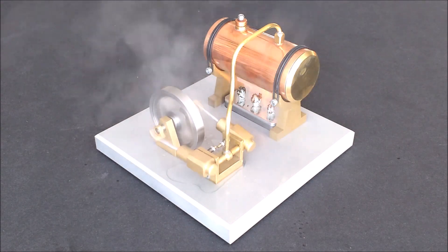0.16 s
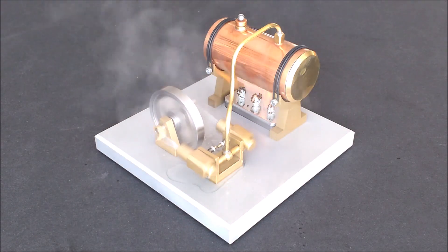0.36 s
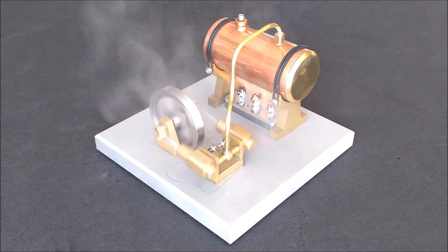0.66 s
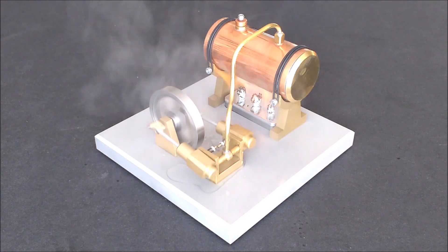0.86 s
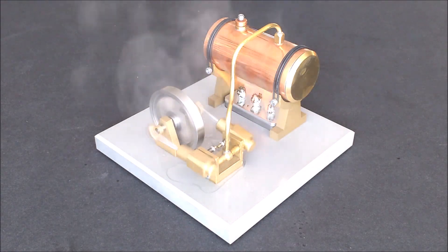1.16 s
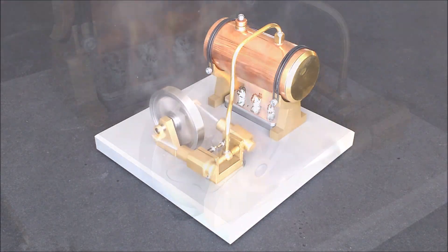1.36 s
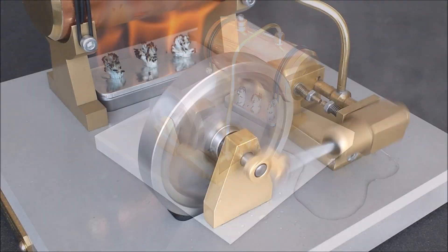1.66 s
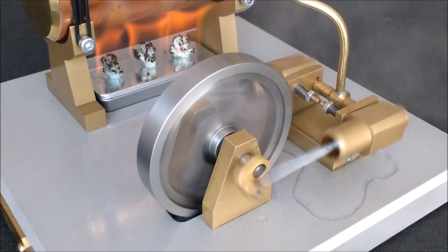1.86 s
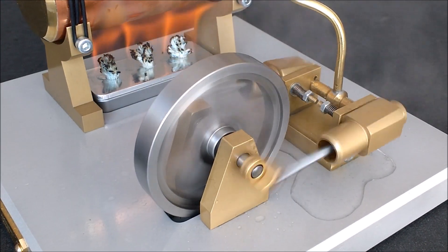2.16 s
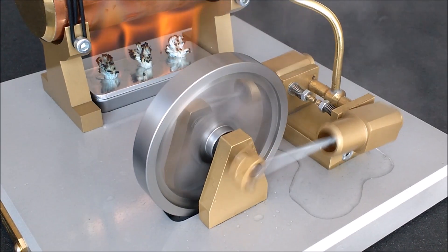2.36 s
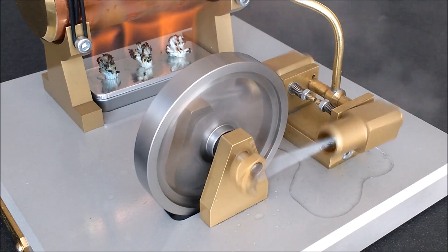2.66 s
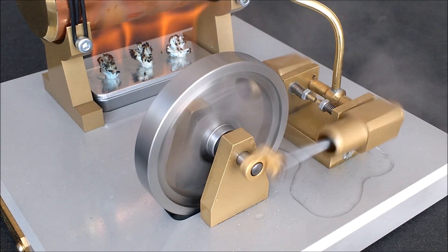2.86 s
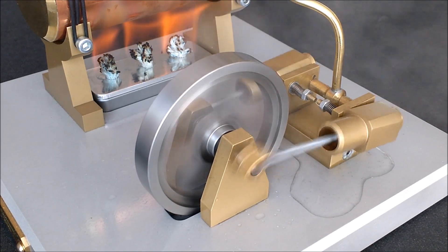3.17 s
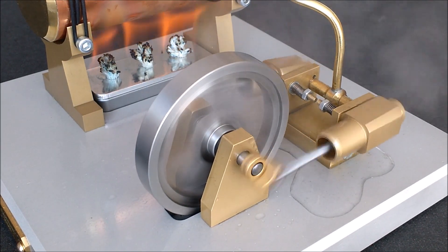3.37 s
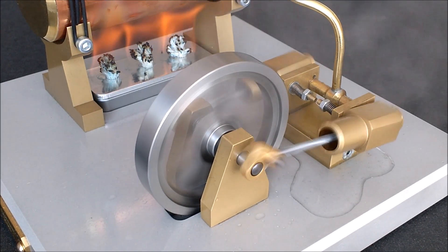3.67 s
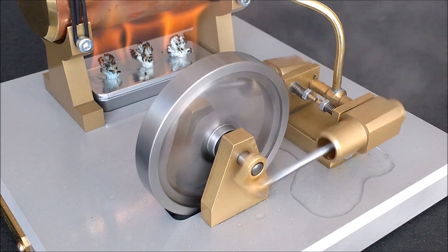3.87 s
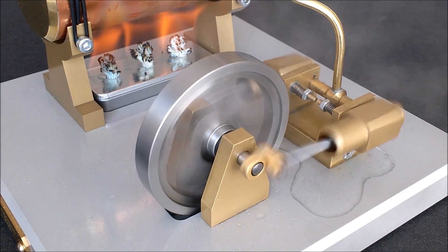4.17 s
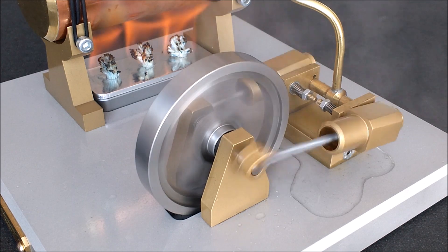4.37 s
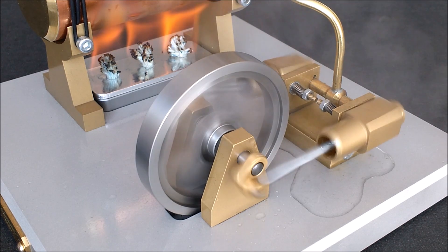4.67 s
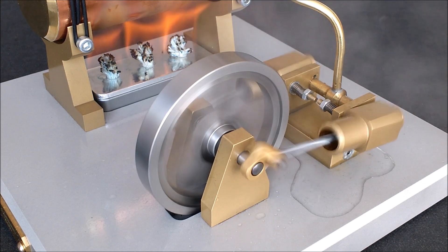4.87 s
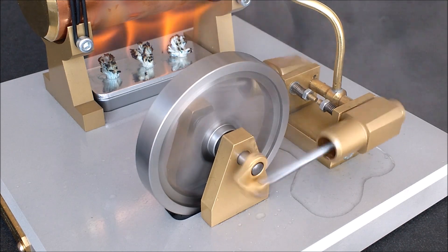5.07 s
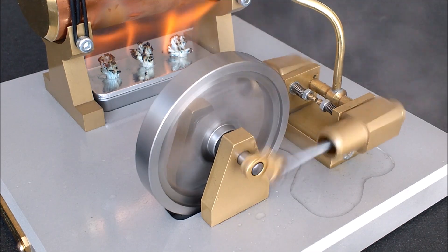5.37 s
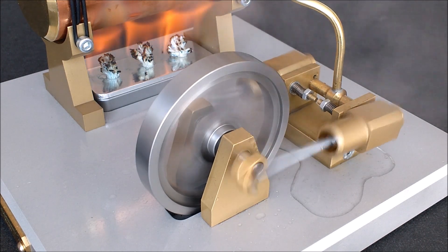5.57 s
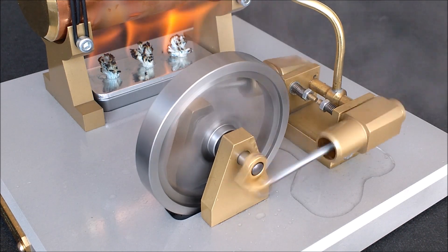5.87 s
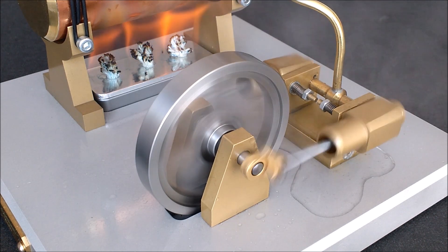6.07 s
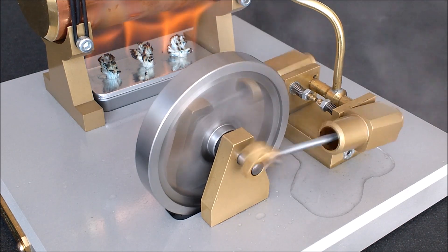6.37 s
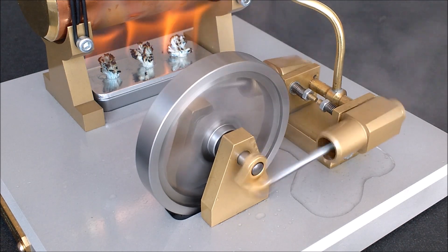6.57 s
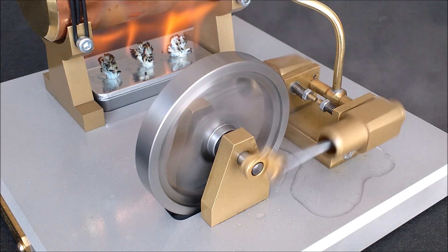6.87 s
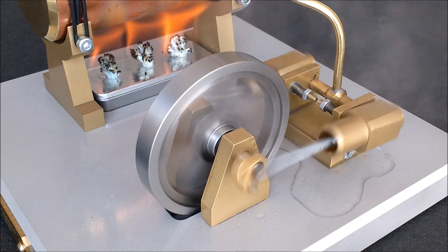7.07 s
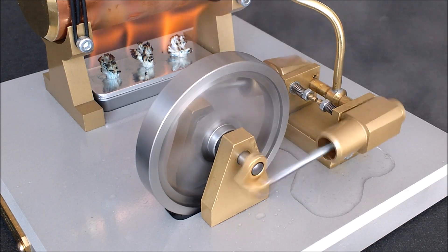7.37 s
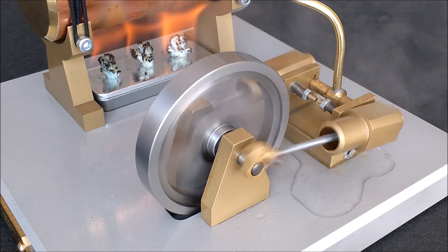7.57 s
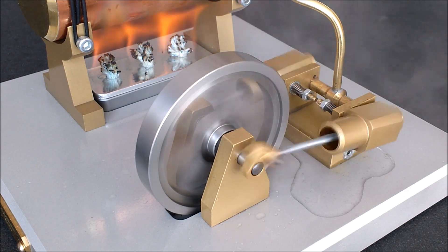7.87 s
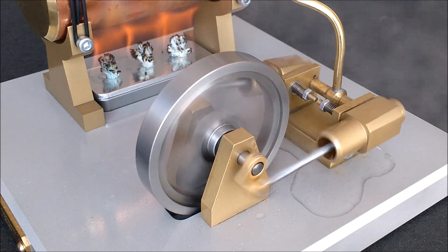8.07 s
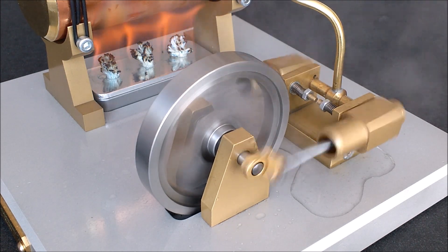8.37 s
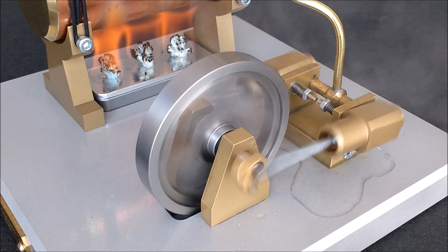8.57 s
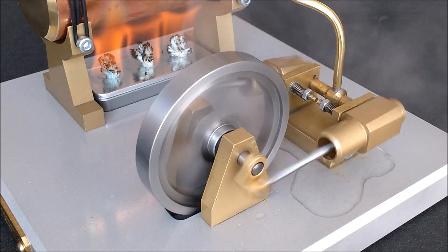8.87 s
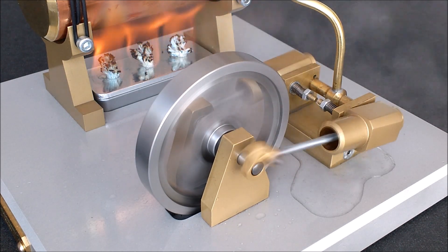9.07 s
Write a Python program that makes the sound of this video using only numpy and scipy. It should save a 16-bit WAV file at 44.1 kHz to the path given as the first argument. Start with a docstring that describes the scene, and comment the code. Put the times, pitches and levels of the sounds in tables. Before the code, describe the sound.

Rapid sharp exhaust puffs from a miniature steam engine cross-fade to a close mechanical chugging with gritty knocks, chirping hiss and tiny snaps.

```python
"""A small brass steam engine on a metal base plate in a quiet room: first from afar at a fast pace, near 11
turns a second, then, after a cross-fade at about 2 s, close up and slower, near 7.5 turns a second.
Gritty noise bursts locked to the crank angle make the knocks, puffs and whistle, over shaped noise for hiss and
wavering sines for hum. From the cross-fade on, ringing partials add snaps of water drops and loose parts.
The two microphone ports hear it with opposite sign, the right one a little later, within a diffuse layer."""
import sys
import numpy as np
from scipy import signal
from scipy.fft import rfft, irfft, next_fast_len
from scipy.io import wavfile
from scipy.ndimage import uniform_filter1d, map_coordinates

SR = 44100
rng = np.random.default_rng(int(sys.argv[2]) if len(sys.argv) > 2 else 0)


def dump(signal):
    """Clip the signal to [-1, 1] and save it as 16-bit WAV at the path in sys.argv[1]."""
    limited = np.clip(np.atleast_2d(signal).T, -1, 1)
    pcm = np.round(limited * 32767).astype(np.int16)
    wavfile.write(sys.argv[1], SR, pcm)


N = 406602
T = np.arange(N) / SR
SIZE = next_fast_len(N + 8192)  # padded transform length
HZ = np.fft.rfftfreq(SIZE, 1 / SR)

# crank at dead centre, far view: (time [s], count [turns])
FAR_TURNS = [(0.0816, 0), (0.4397, 4), (0.8003, 8), (1.1681, 12), (1.5325, 16), (1.7199, 18)]
# crank at dead centre, close view: (time [s], count [turns])
NEAR_TURNS = [(1.3180, 0), (2.9063, 12), (3.9656, 20), (4.4970, 24), (5.0305, 28), (5.5690, 32),
              (6.1118, 36), (7.2018, 44), (9.2456, 59)]


def amp(db):
    """Decibels to linear gain."""
    return 10 ** (np.asarray(db) / 20)


def unit(x):
    """Scale to an RMS of one."""
    return x / np.sqrt(np.mean(x ** 2) + 1e-20)


def along(points, column=1):
    """Interpolate a column of (frequency [Hz], value, ..) rows on a log frequency axis."""
    table = np.transpose(points)
    return np.interp(np.log(HZ + 1), np.log(table[0]), table[column])


def filtered(x, response):
    """Apply a frequency response through the spectrum."""
    return irfft(rfft(x, SIZE) * response, SIZE)[..., :N]


def resonance(hz, width_hz):
    """Response of a damped resonator, unity at its centre."""
    damping = 1j * HZ * width_hz
    return damping / (hz ** 2 - HZ ** 2 + damping)


def wobble(rate):
    """A random curve with straight lines between `rate` knots a second."""
    knots = rng.standard_normal(int(N * rate / SR) + 4)
    return map_coordinates(knots, [T * rate], order=1)


def level(rows):
    """Gain curve over time from (time [s], level [dB]) rows."""
    s, db = np.transpose(rows)
    return amp(np.interp(T, s, db))


def hiss(db, hum, patchy_db, hum_db):
    """Boiler, burner and bearings: steady hiss with random patches, and a few wavering tones."""
    # spectrum of the hiss: (frequency [Hz], relative level [dB])
    hiss_colour = [(25, -37), (70, -27), (110, -2.5), (200, -7), (450, -11), (1000, -2), (2500, -9),
                   (5000, -7.5), (8000, -16), (11000, -17), (15500, -20.5)]
    z = signal.stft(rng.standard_normal(N), nperseg=256)[2]
    patches = uniform_filter1d(rng.standard_normal(z.shape), 5, 0)
    patches = unit(uniform_filter1d(patches, 5, 1))
    noise = signal.istft(z * amp(patchy_db * patches), nperseg=256)[1][:N]
    noise = noise * amp(1.5 * wobble(70))  # fast flutter in dB, shared by all bands
    tones = 0
    for hz, width_hz, tone_db in hum:
        tone_gain = amp(tone_db + 4.5 * wobble(12))
        pitch = hz + width_hz * wobble(25) / 2
        tones = tones + tone_gain * np.sin(2 * np.pi * np.cumsum(pitch) / SR)
    steady = unit(filtered(noise, amp(along(hiss_colour))))
    return amp(db) * (steady + amp(hum_db) * unit(tones))


def diffuse(x):
    """A diffuse layer: the same bursts with unrelated phases at each port."""
    # colour of the diffuse layer: (frequency [Hz], level re direct [dB])
    diffuse_colour = [(40, -20), (70, -14), (110, -8), (300, -2), (700, -9), (1100, -17), (1750, -1),
                      (2250, -9), (2380, -38), (2640, -38), (2800, -8), (3000, -1), (3700, -11), (4350, 0),
                      (5000, -11), (5650, 0), (6350, -8), (7000, -5), (7650, -10), (8400, -4), (9700, -1),
                      (10500, -8), (11200, 0), (11800, -8), (12400, 2), (12950, -9), (13600, 2),
                      (14300, -8), (14800, 2), (15300, -10)]
    # extra diffuse sound near 2.5 kHz around each knock: (centre [Hz], width [Hz], level [dB],
    # centre angle [turns], half length [turns], natural-log spread of the length)
    knock_extra = (2520, 450, -8, .05, .17, .45)
    z = signal.stft(x, nperseg=128)[2]
    phases = np.exp(2j * np.pi * rng.random((2,) + z.shape))
    wet = unit(signal.istft(z * phases, nperseg=128)[1][:, :N]) * np.std(x)

    hz, width_hz, db, centre, half_length, spread = knock_extra
    far_angle = np.interp(T, *np.transpose(FAR_TURNS)) + .25
    near_angle = np.interp(T, *np.transpose(NEAR_TURNS))
    angle = np.where(T < NEAR_TURNS[0][0], far_angle, near_angle)
    from_knock = (angle - centre + .5) % 1 - .5
    varied_length = half_length * np.exp(spread * unit(wobble(7)))
    knocking = np.exp(-(from_knock / varied_length) ** 4)
    extra = filtered(wet * knocking, resonance(hz, width_hz) ** 2)
    return filtered(wet, amp(along(diffuse_colour))) + amp(db) * extra


def snaps():
    """Water drops and loose parts: each snap is three close partials that swell and die together."""
    # (time [s], peak before the band filter [dB], centre [Hz], swell and decay [s])
    snap_rows = [(1.8208, -23, 1710, 0.00012), (2.052, -24, 6500, 0.00033), (2.226, -28, 1050, 0.00021),
                 (2.247, -28, 1060, 0.00018), (2.453, -28, 6860, .0005), (2.713, -28, 6800, .0004),
                 (3.047, -29, 8060, 0.00095), (3.683, -17, 1200, 0.00022), (3.7132, -27, 3550, 0.00051),
                 (3.841, -35, 3400, .0006), (3.9058, -23, 6800, .0003), (4.396, -30, 7000, .0006),
                 (4.42, -29, 6200, 0.00055), (4.507, -28.5, 8260, .0005), (4.768, -35, 1040, 0.0015),
                 (4.7725, -27.5, 8400, .0008), (5.035, -33, 3360, 0.0015), (5.17, -32, 8400, .0008),
                 (5.302, -33, 3460, 0.00093), (5.37, -28, 6800, .001), (5.846, -28, 8870, .0008),
                 (5.982, -30.5, 3400, 0.0027), (6.044, -27, 6900, 0.0013), (6.305, -31, 6000, .0004),
                 (6.316, -25.5, 6200, 0.00081), (6.322, -26, 6460, 0.00071), (6.53, -31, 8750, .0006),
                 (6.651, -29.5, 1030, 0.00043), (7.2724, -24, 6910, 0.00038),
                 (7.3414, -29.5, 3360, 0.00038), (7.758, -34, 8550, 0.00034), (7.8046, -25, 6670, 0.00034),
                 (7.826, -33, 7550, .001), (8.432, -28.5, 3450, 0.0011), (8.484, -25, 5500, .0003),
                 (8.496, -28, 6500, .0004), (8.841, -30, 8800, 0.00036), (8.845, -26, 8660, 0.00054),
                 (9.114, -32, 3430, 0.0025)]
    out = np.zeros(N + SR)
    t = np.arange(SR // 40) / SR
    detune = 1 + 0.0585 * rng.standard_normal((len(snap_rows), 3))  # relative spread of the partials
    for (s, db, hz, swell), ratios in zip(snap_rows, detune):
        partials = np.sin(2 * np.pi * hz * ratios[:, None] * t).sum(0)
        ring = partials * t / swell * np.exp(-t / swell)
        out[round(s * SR):][:len(t)] += amp(db) * ring / np.abs(ring).max()
    return filtered(out[:N], resonance(2200, 5900))


def dips():
    """Sudden steps down in level, just after some of the snaps, that creep back."""
    # (time [s], level [dB])
    dip_rows = [(2.061, -5.5), (3.916, -3.5), (4.521, -5.5), (7.285, -7.5)]
    fall_s, recover_s = 0.0029, 0.32
    start, db = np.transpose(dip_rows)
    since = np.clip(T - start[:, None], 0, None)
    shape = (1 - np.exp(-since / fall_s)) * np.exp(-since / recover_s)
    return amp(db @ shape)


def per_turn(usual_db, spread_db, chosen_turns):
    """Strength in dB of every close turn: the usual, some chance, and an offset on chosen turns."""
    s, turns = np.transpose(NEAR_TURNS)
    turn_db = usual_db + spread_db * rng.standard_normal(int(turns[-1]) + 1)
    for when, db in chosen_turns:
        turn_db[round(np.interp(when, s, turns))] += db
    return turn_db


def strokes(rows, times, turns, turn_db, scatter_db, grit_db):
    """Bursts of gritty noise and ringing, started each turn at their crank angle, each in its own band."""
    angle = np.interp(T, times, turns)
    period = (times[-1] - times[0]) / (turns[-1] - turns[0])  # mean seconds per turn
    # droplets and chatter, shared by all bands
    grit = unit(amp(grit_db * wobble(600)) * rng.standard_normal(N))
    total = 0
    for start, rise, decay, db, hz, width_hz in rows:
        luck = rng.standard_normal((int(turns[-1]) + 2, 3))  # per turn: strength, delay, pitch
        which = np.clip(np.arange(len(luck)) - 1, 0, len(turn_db) - 1)
        gain = amp(db + scatter_db * luck[:, 0] + turn_db[which])
        since = (angle - start) % 1 * period
        live = np.flatnonzero((since < 9 * decay + rise) & (T < times[-1]))
        turn = np.floor(angle[live] - start).astype(int) + 1
        # play in the linkage delays each burst a little, in seconds
        since = np.clip(since[live] - 0.000693 * np.abs(luck[turn, 1]), 0, None)
        attack = 1 - np.exp(-(since / rise) ** 2)
        shape = attack * np.exp(-since / decay) * (1 + rise / decay)
        # low knocks are blows that ring the base plate; high ones are mostly escaping steam
        blow = min(450 / hz, .8)  # share of ringing in the power
        pitch = hz * (1 + 0.1247 * luck[turn, 2])
        ring = np.sqrt(2) * np.sin(2 * np.pi * pitch * since)
        band = resonance(hz, width_hz) ** 2
        noise_loss = np.sqrt(np.mean(np.abs(band) ** 2))  # offsets what the band takes from the noise
        steam = grit[live] / noise_loss
        force = np.zeros(N)
        force[live] = (np.sqrt(1 - blow) * steam + np.sqrt(blow) * ring) * shape * gain[turn]
        total = total + rfft(force, SIZE) * band
    return irfft(total, SIZE)[:N]


def far_engine():
    """The fast engine: one sharp exhaust puff a turn, with smaller bursts, over a thick hiss."""
    # bursts of one turn: (crank angle [turns], rise [s], decay [s], level [dB], centre [Hz], width [Hz])
    far_stroke = [(.95, 0.0022, 0.005, -39, 8300, 6900), (0.91, 0.0033, 0.011, -43.5, 3600, 4100),
                  (1, 0.0043, 0.0065, -44, 1000, 1000), (0.034, 0.0066, 0.027, -51.5, 11800, 5100),
                  (0.75, 0.0017, 0.004, -45.5, 3400, 3200), (.64, 0.0037, 0.0074, -47, 144, 150),
                  (0.88, 0.0064, 0.0076, -45, 146.4, 200), (0.58, 0.0034, 0.008, -52, 453, 520),
                  (.44, 0.0066, 0.014, -48.5, 265, 77), (1, 0.0023, .003, -49, 1080, 610),
                  (0.765, 0.002, 0.0037, -45, 1115, 800), (0.152, 0.003, 0.0053, -48.5, 6300, 3800),
                  (0.69, .001, 0.0016, -57, 4100, 2500), (0.75, 0.0019, 0.0027, -47.5, 6600, 2500),
                  (0.58, .0015, 0.0045, -46, 9000, 8000), (.48, .002, 0.0034, -50, 14000, 8000),
                  (.68, .0015, 0.0027, -47, 1110, 800)]
    # wavering tones: (centre [Hz], pitch wander [Hz], level [dB])
    far_hum = [(115.7, 11, -8.5), (138.3, 9.3, -3), (166, 9.3, -7), (259, 13, -6), (288, 15.6, -3.5),
               (356, 5.7, -2.5), (923, 14.8, 2.5)]
    # fader of the far view: (time [s], level [dB])
    far_fader = [(0, -1), (.5, 0.5), (1, -0.5), (1.3, 0), (1.6, -1), (1.8, 2.5), (1.95, -6.5), (2.06, -41)]
    # tone of the far view: (frequency [Hz], level [dB])
    far_tilt = [(60, -4), (85, -4), (110, -0.5), (140, 0.5), (170, 1.5), (220, -7.5), (290, -0.5),
                (600, -2), (1000, 0), (1500, 0.5), (2200, -1.5), (3000, 0), (7000, 2), (12000, 4),
                (15000, 3)]
    s, turns = np.transpose(FAR_TURNS)
    # run on for one turn before the table and four after it
    s = np.r_[s[0] - .0893, s, s[-1] + .372]
    turns = np.r_[0, turns + 1, turns[-1] + 5]
    beat = strokes(far_stroke, s, turns, np.zeros(1), scatter_db=1.5, grit_db=3)
    bed = hiss(-45.5, far_hum, patchy_db=1.5, hum_db=-9.5)
    return level(far_fader) * filtered(beat + bed, amp(along(far_tilt)))


def near_engine():
    """The close engine: knock and spit near dead centre, puff, rising whistle, thump, clinks and rattles."""
    # bursts of one turn: (crank angle [turns], rise [s], decay [s], level [dB], centre [Hz], width [Hz])
    knock = [(0.0295, 0.0013, 0.0033, -41.5, 1066, 840), (.085, 0.0008, 0.0017, -41.5, 1030, 1400),
             (0.01033, 0.0046, 0.009, -42, 3300, 4600), (0.0013, 0.0019, 0.0036, -46, 461, 410),
             (0.0028, 0.0033, 0.04, -56, 258, 58)]
    spit = [(0.0051, 0.002, 0.003, -40, 7740, 4170), (0.0486, 0.0021, 0.0038, -44, 9470, 7000)]
    puff = [(.215, 0.0029, 0.0091, -46, 1100, 850), (.21, 0.0037, 0.01, -42, 3500, 2800),
            (0.19, 0.0077, 0.01, -40, 7300, 13000), (0.19, 0.0025, 0.0037, -51, 474, 480),
            (0.29, 0.025, 0.041, -51.5, 9100, 17000)]
    whistle = [(.425, 0.0015, 0.0076, -48, 5520, 1250), (.475, 0.0029, 0.0063, -47, 6580, 1400),
               (.51, 0.0038, 0.0047, -46.5, 7280, 2100)]
    thump = [(.46, 0.0022, 0.0036, -47, 402, 420)]  # at the far end of the stroke
    clink = [(.67, 0.0012, 0.0027, -53.5, 3630, 1400), (.75, 0.0026, 0.0062, -51, 3500, 1200)]  # on the return stroke
    rattle = [(.398, 0.00051, 0.0014, -37, 5000, 3100), (0.1137, 0.0026, 0.0048, -53, 121, 170),
              (.58, 0.0028, 0.0041, -46.5, 133, 155), (.685, 0.0034, 0.0051, -49.5, 138, 130),
              (.79, 0.0039, 0.0057, -48.5, 131, 220), (0.67, 0.0051, 0.0055, -59, 474, 580),
              (.4, 0.0009, 0.0021, -46.5, 1070, 1200), (.47, 0.0018, 0.0043, -52.5, 1130, 730),
              (0.4, 0.002, 0.01, -46, 3300, 1600), (0.76, 0.0028, 0.0022, -51.5, 8800, 6100),
              (0.61, 0.0014, 0.0029, -46, 9700, 10000), (.76, 0.0022, 0.0049, -45, 9740, 13000)]
    # strength of chosen turns relative to the usual: (time [s], level [dB])
    knock_turns = [(1.98, 0.5), (2.245, 3), (2.377, 1), (2.641, 2.5), (2.773, -1), (3.039, 3), (3.701, 2.5),
                   (3.833, 3.5), (4.098, -2), (4.231, 2), (4.497, -1), (4.763, 3.5), (5.3, 2), (5.434, 2),
                   (5.84, 1.5), (7.474, -2), (7.611, 1.5), (7.882, -0.5), (8.019, 2), (8.427, 1.5),
                   (8.563, 2.5), (8.701, 0.5), (8.972, -1), (9.109, 3)]
    spit_turns = [(1.98, 4), (2.112, 2), (2.245, 1), (2.377, -4), (2.509, 2), (2.641, 3.5), (2.773, -2),
                  (2.906, .1), (3.039, -1), (3.17, -3), (3.303, -1), (3.435, -2), (3.568, 3.5),
                  (3.701, 2.5), (3.833, 1), (4.098, 1), (4.763, 3), (4.897, 4.5), (5.03, 0.5), (5.165, -2),
                  (5.434, -3), (5.705, 0.5), (5.976, -1), (6.384, 2.5), (6.521, 1.5), (7.066, 2),
                  (7.338, 0), (7.474, -6), (7.611, -3), (7.883, -6), (8.019, -1), (8.292, 1), (8.428, -2),
                  (8.564, 4.5), (8.701, -4), (8.973, -4)]
    puff_turns = [(1.98, 2), (4.63, 0), (4.763, -6), (5.705, -6), (6.248, 3.5), (6.521, -0.5), (6.929, 1),
                  (8.156, 2.5), (8.837, -5)]
    whistle_turns = [(1.583, -5), (1.847, -4), (2.641, 1.5), (2.773, -3), (2.906, 2), (3.039, -3),
                     (3.17, -5.5), (3.567, -14), (3.701, -6), (3.966, -9), (4.497, 4), (4.898, -16),
                     (5.165, 1), (5.434, 2.5), (5.569, 0.5), (6.112, -6), (6.383, -13), (6.52, -4.5),
                     (6.929, 1), (7.202, -4), (7.61, -10), (8.02, -3.5), (8.156, 1), (8.428, -9),
                     (8.564, -1.5), (8.701, 0), (8.972, -4), (9.109, -3)]
    thump_turns = [(3.701, 5), (4.098, 0), (4.364, -3), (5.3, 4), (5.434, 6), (5.569, 2), (6.112, 0),
                   (6.248, 6), (6.657, 4), (6.793, 2), (7.611, 0), (8.156, 6), (8.428, 4), (8.701, 8),
                   (8.837, 1)]
    clink_turns = [(4.231, 10), (4.364, 5), (4.897, 8), (5.165, 10), (5.705, -4), (5.84, 10), (6.793, 5),
                   (8.292, 0), (8.428, 5.5)]
    # wavering tones: (centre [Hz], pitch wander [Hz], level [dB])
    near_hum = [(112.7, 5.95, -0.5), (140.8, 8.6, -9.5), (166.2, 10.6, -3.5), (257, 23.66, -6),
                (353, 9.6, -10), (922, 19.6, -3)]
    # fader of the close view: (time [s], level [dB])
    near_fader = [(1.3, -5.5), (1.45, 2.5), (1.7, 0.5), (1.95, 2), (2.3, 3.5), (3.05, 0.5), (3.55, 2),
                  (4.0, 1), (4.5, 3), (5.05, 0.5), (5.3, 1.5), (6.05, 2), (6.8, 1), (7.28, 4), (8.05, 1),
                  (8.3, 3), (8.8, 1), (9.22, 0)]

    s, turns = np.transpose(NEAR_TURNS)
    # usual strength and turn-to-turn spread in dB lead each per_turn
    beat = strokes(knock, s, turns, per_turn(1.5, .9, knock_turns), scatter_db=.8, grit_db=1.5)
    beat += strokes(spit, s, turns, per_turn(0, .9, spit_turns), scatter_db=.6, grit_db=2)
    beat += strokes(puff, s, turns, per_turn(0.46, 1.1, puff_turns), scatter_db=.6, grit_db=1.5)
    beat += strokes(whistle, s, turns, per_turn(6.5, 1.2, whistle_turns), scatter_db=.8, grit_db=2)
    beat += strokes(thump, s, turns, per_turn(0, .9, thump_turns), scatter_db=.8, grit_db=1.5)
    beat += strokes(clink, s, turns, per_turn(0, .9, clink_turns), scatter_db=2, grit_db=2)
    beat += strokes(rattle, s, turns, np.zeros(1), scatter_db=1.5, grit_db=2.5)
    bed = hiss(-48.5, near_hum, patchy_db=2.0, hum_db=-10.0)
    return level(near_fader) * dips() * (beat + bed)


def scene():
    """Mix both views and the snaps, ride the bass, and add the diffuse layer for two ports."""
    # fader of the bass: (time [s], level [dB])
    bass_fader = [(0, 1.5), (.6, 0), (1.2, 0.5), (2, 0), (2.8, 1), (3.3, 0), (3.8, 0), (4.4, -0.5),
                  (4.9, -1.5), (5.5, -1.5), (6.6, 0), (7.4, -2), (8.2, -1), (9.22, -1.5)]
    bass_top_hz = 188
    engine = far_engine() + near_engine() + snaps()
    bass = filtered(engine, 1 / (1 + (HZ / bass_top_hz) ** 4))
    engine = engine + (level(bass_fader) - 1) * bass
    return engine + diffuse(engine)


def record(dry):
    """Port colours; the right port is inverted and late by a slightly wavering lag; all is band limited."""
    # colour of each port, with base plate and table echoes: (frequency [Hz], left [dB], right [dB])
    port_colour = [(100, 3.5, 2.5), (405, -0.5, -3), (714, 0, -1), (940, 0, -0.5), (1313, 1.5, 2),
                   (1606, -7, 0.5), (1827, -2, 0), (2256, 7, 10), (2355, 0, -4), (2400, 2, 2),
                   (2700, 1.5, 1.5), (2680, 1.5, 5.2), (3040, 1, -0.5), (4240, -2.5, -3), (6800, 0.5, -1),
                   (7720, 4, 0), (11600, -3, -4.5), (13300, -9, -3.5), (14000, -3, -2), (14650, -5, -9),
                   (15300, -8, -11), (15800, -20, -24)]
    # phase of the right port besides inversion and lag: (frequency [Hz], phase [rad])
    right_phase = [(100, -0.93), (300, -1.53), (750, -0.96), (1350, 0.087), (2000, -0.75), (2240, -.62),
                   (2400, -.47), (2500, -0.228), (2600, .014), (2700, .24), (2780, .24), (2930, -.04),
                   (3050, -.25), (3200, -0.32), (3800, -0.77), (4500, -0.41), (5100, -0.18), (6400, 0.3),
                   (7600, -0.22), (9200, -0.55), (10500, 0.71), (11800, -0.44), (13000, 0), (14300, .1),
                   (15400, -0.61)]
    right_lag_s, lag_waver_s, top_hz = 17 / SR, 1.5e-6, 15800
    left, right = dry
    # the lag of the whole right port wavers slightly at random:
    # subtracting a little of the slope shifts the wave in time
    slope = filtered(right, 2j * np.pi * HZ)
    right = right - lag_waver_s * unit(wobble(18)) * slope
    inverted_late = -np.exp(1j * (along(right_phase) - 2 * np.pi * HZ * right_lag_s))
    left_port = amp(along(port_colour, column=1))
    right_port = amp(along(port_colour, column=2)) * inverted_late
    ports = np.array([left_port, right_port])
    return filtered(np.array([left, right]), ports * (HZ < top_hz))


dry = scene()
out = record(dry)
dump(out)
```